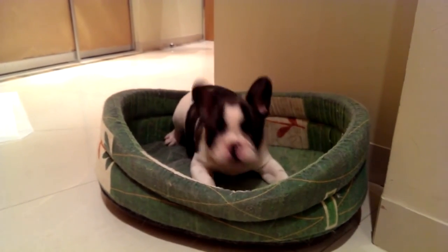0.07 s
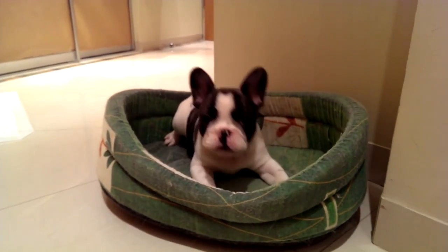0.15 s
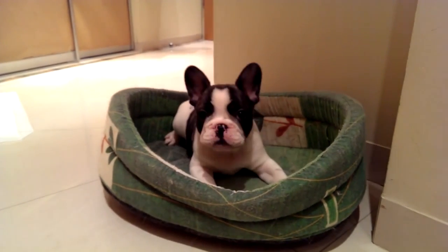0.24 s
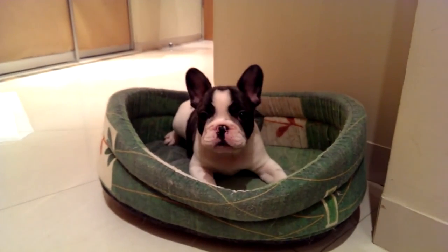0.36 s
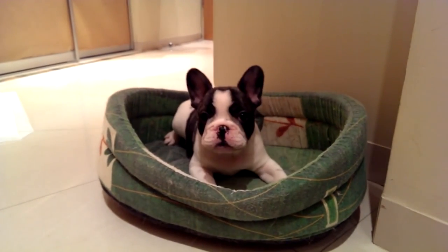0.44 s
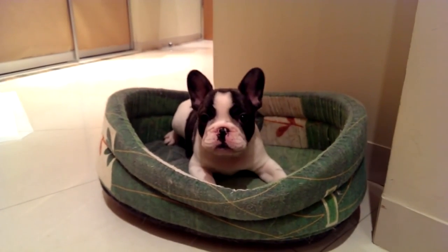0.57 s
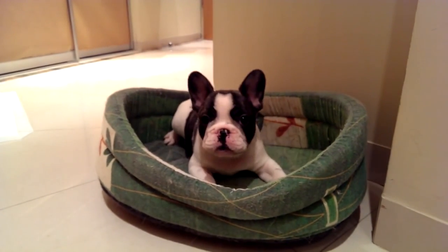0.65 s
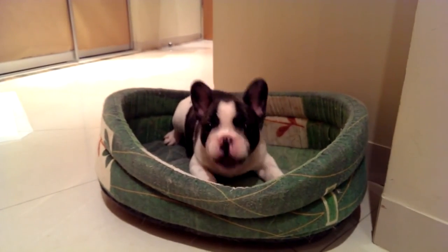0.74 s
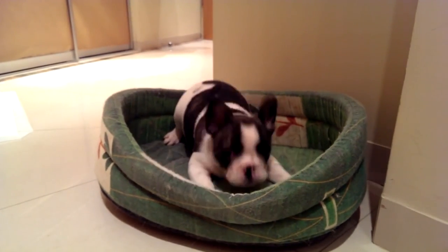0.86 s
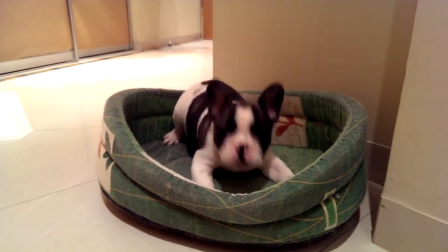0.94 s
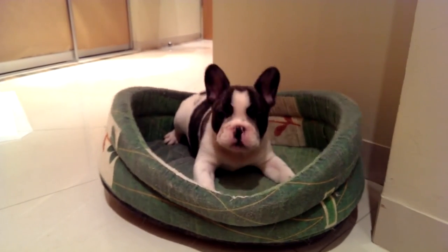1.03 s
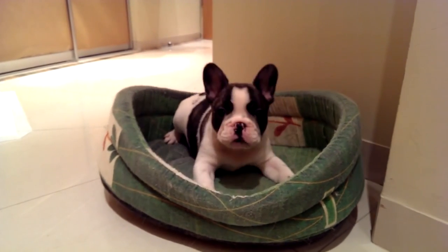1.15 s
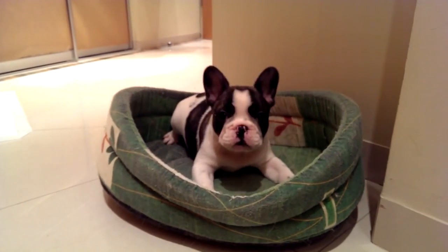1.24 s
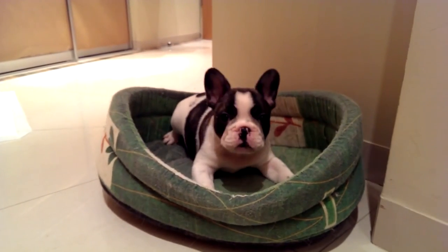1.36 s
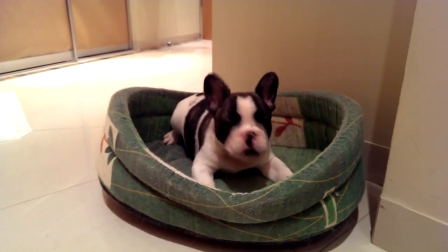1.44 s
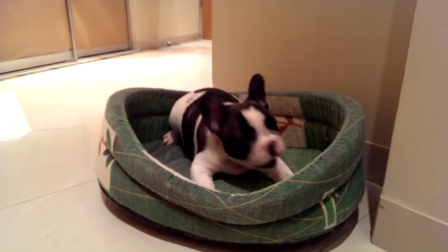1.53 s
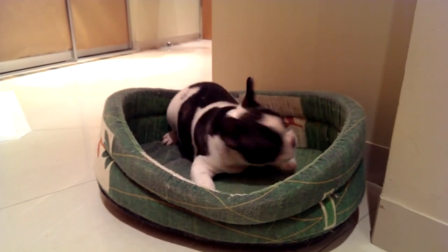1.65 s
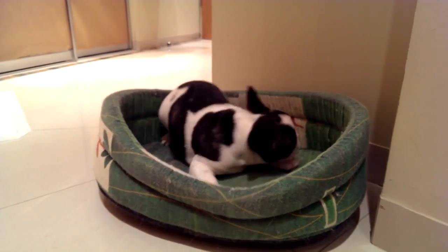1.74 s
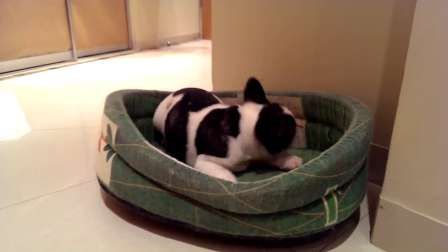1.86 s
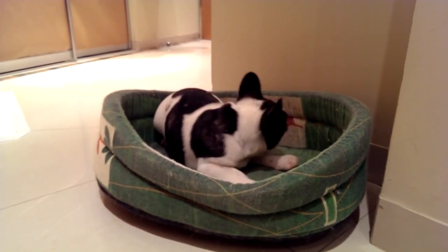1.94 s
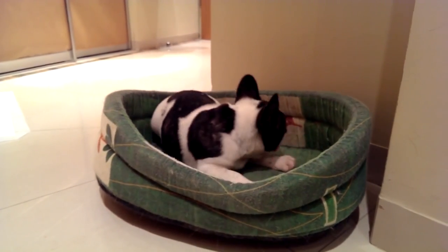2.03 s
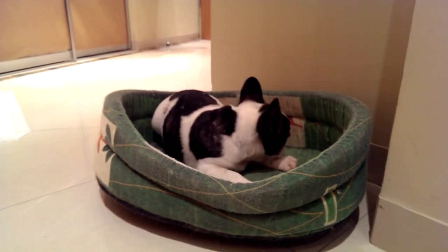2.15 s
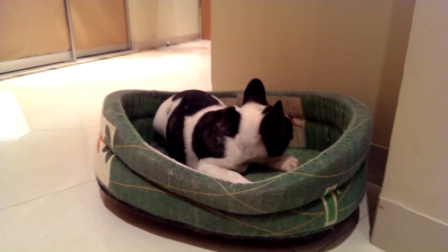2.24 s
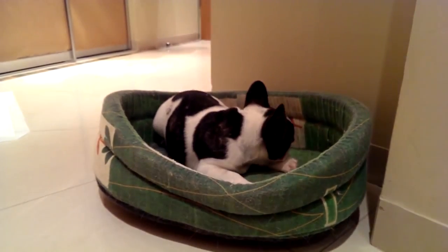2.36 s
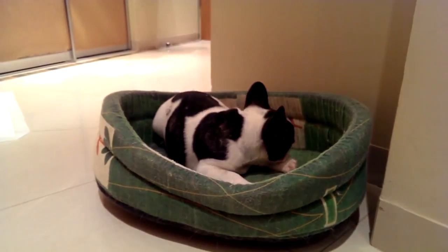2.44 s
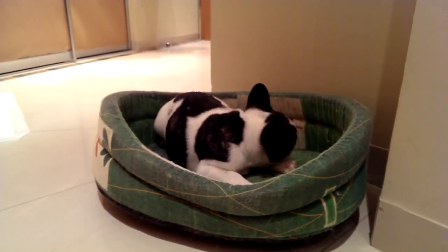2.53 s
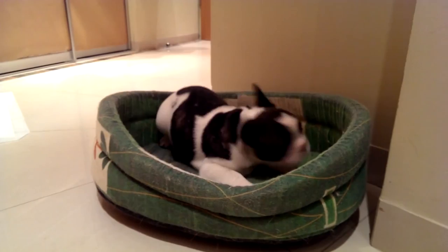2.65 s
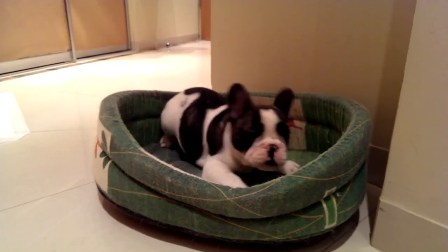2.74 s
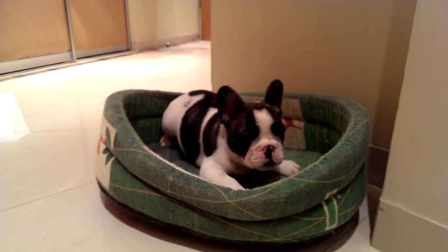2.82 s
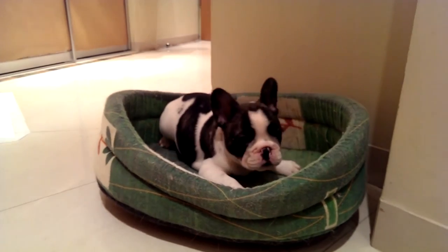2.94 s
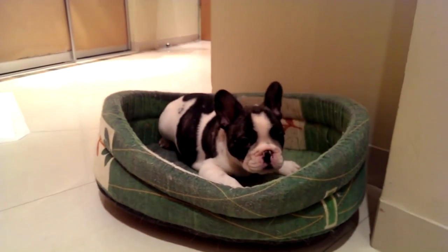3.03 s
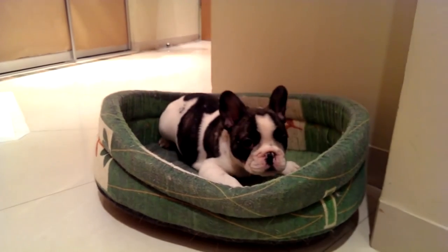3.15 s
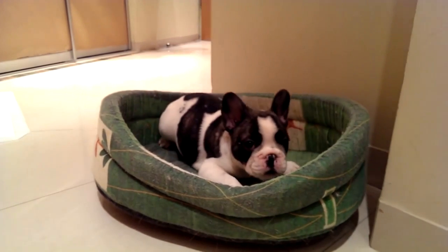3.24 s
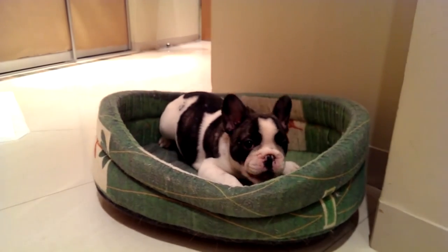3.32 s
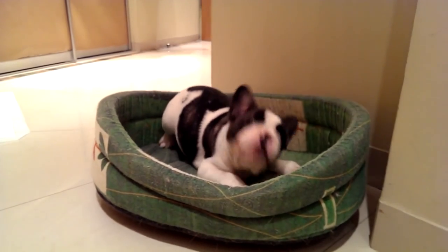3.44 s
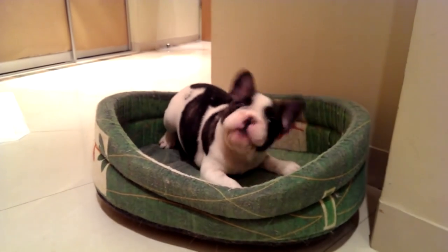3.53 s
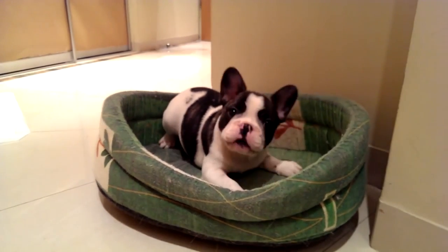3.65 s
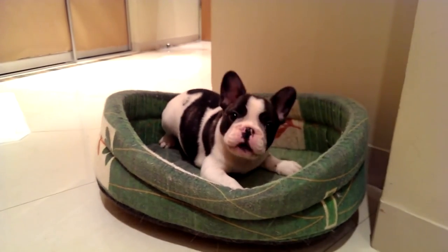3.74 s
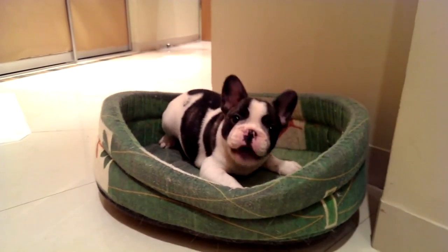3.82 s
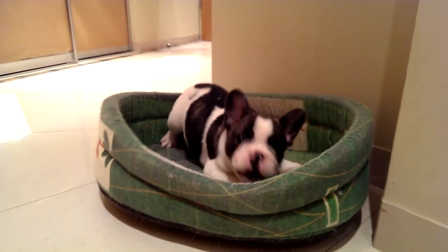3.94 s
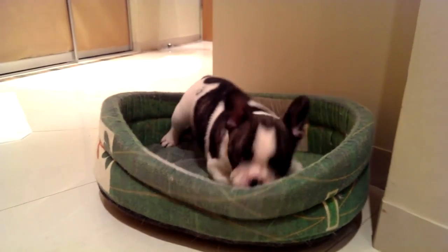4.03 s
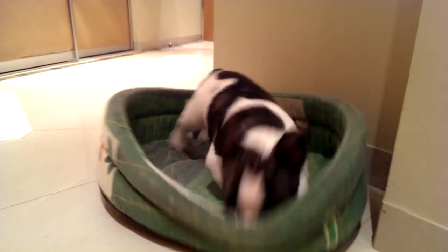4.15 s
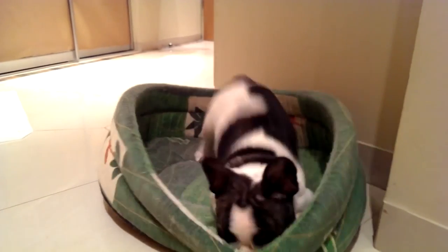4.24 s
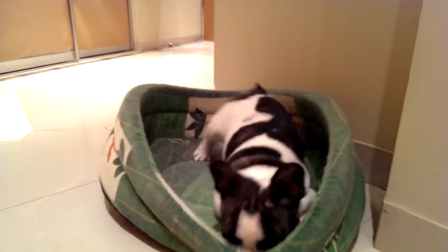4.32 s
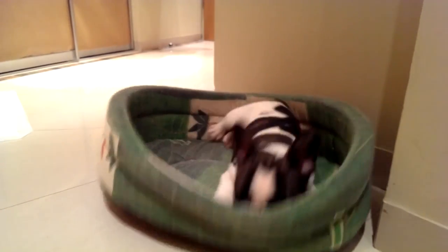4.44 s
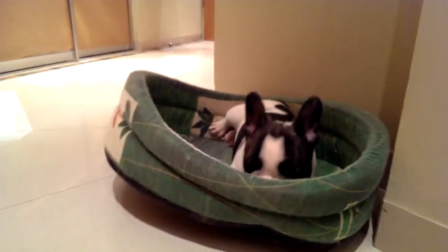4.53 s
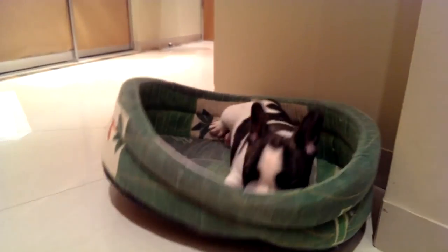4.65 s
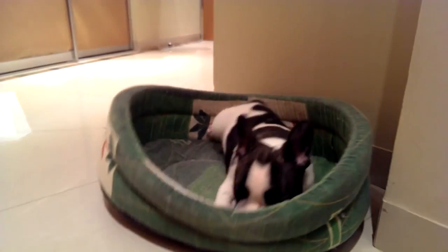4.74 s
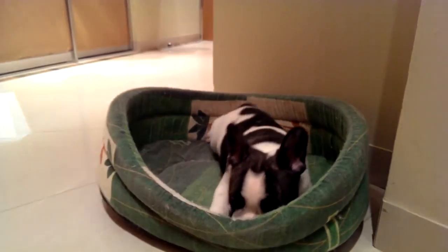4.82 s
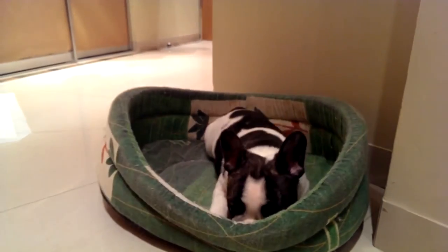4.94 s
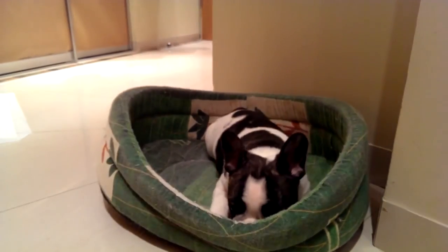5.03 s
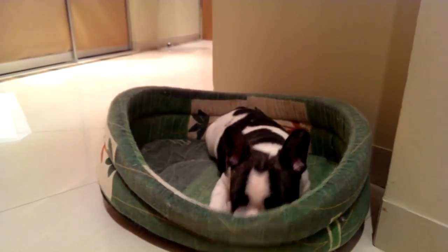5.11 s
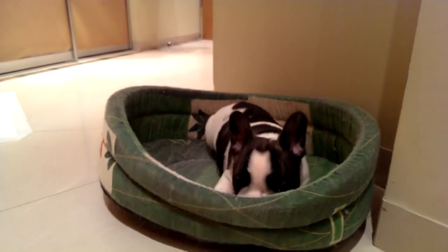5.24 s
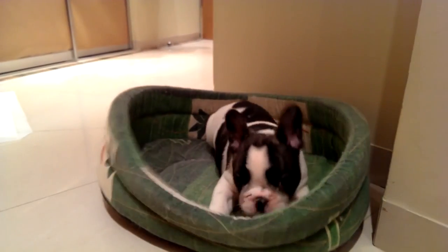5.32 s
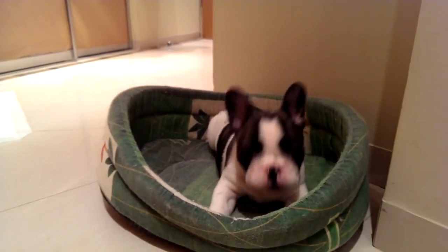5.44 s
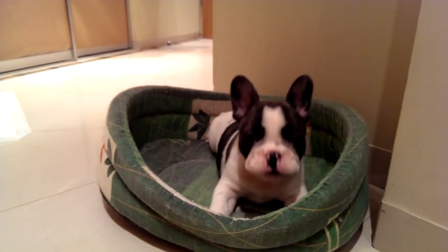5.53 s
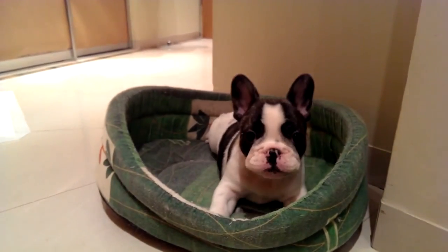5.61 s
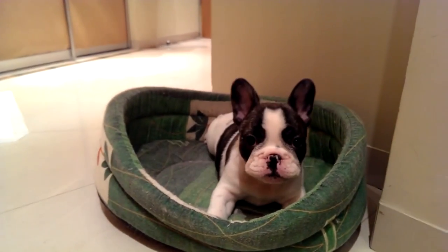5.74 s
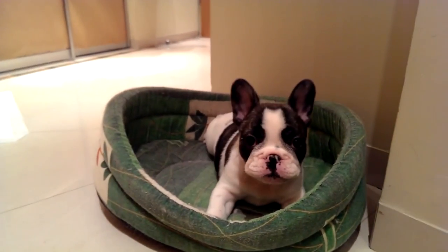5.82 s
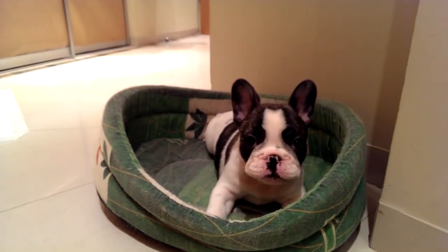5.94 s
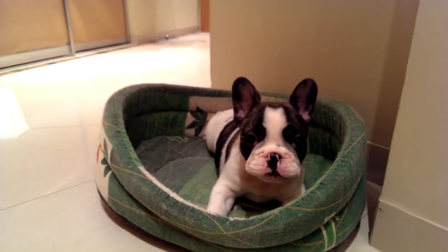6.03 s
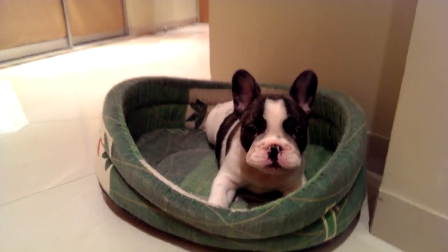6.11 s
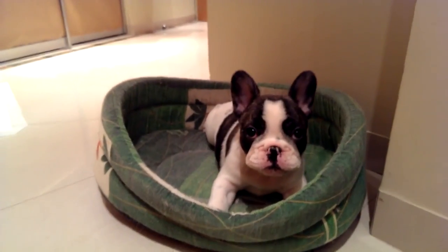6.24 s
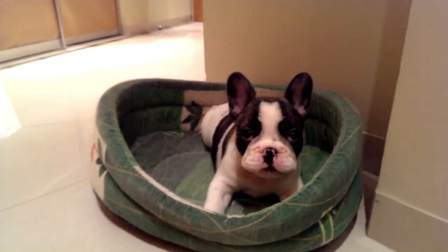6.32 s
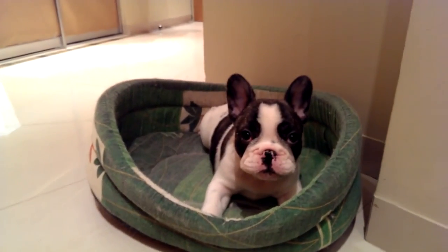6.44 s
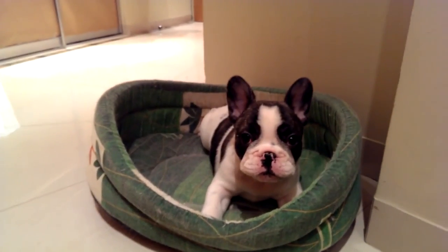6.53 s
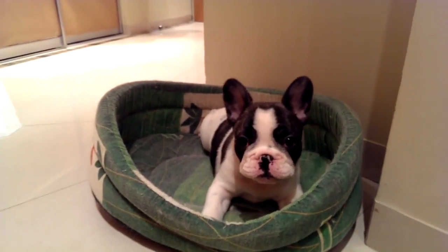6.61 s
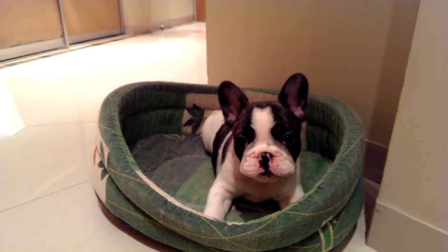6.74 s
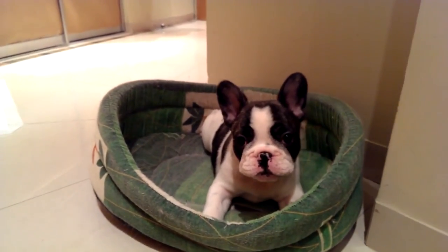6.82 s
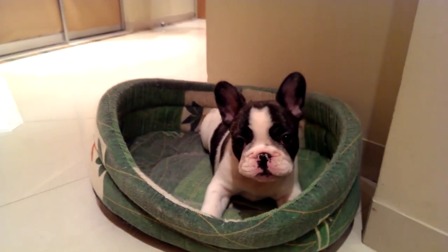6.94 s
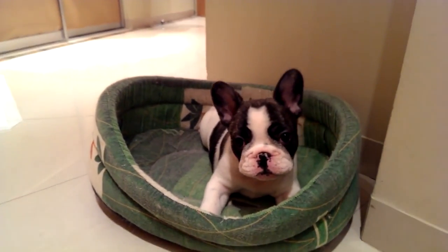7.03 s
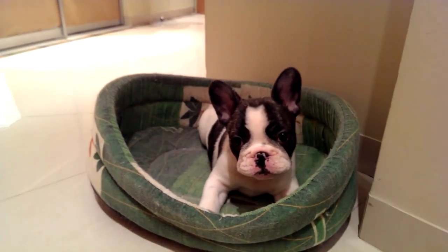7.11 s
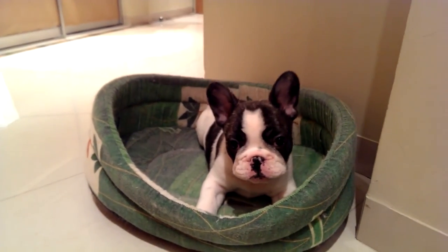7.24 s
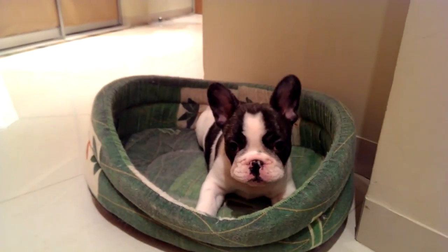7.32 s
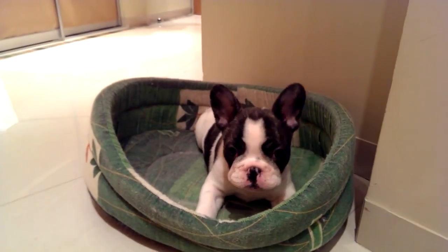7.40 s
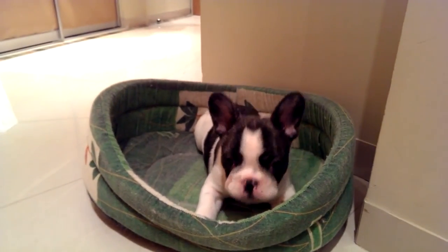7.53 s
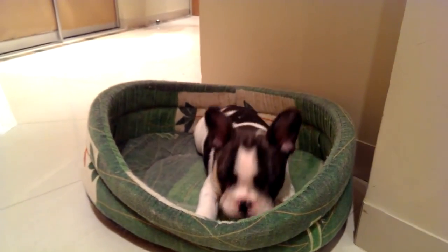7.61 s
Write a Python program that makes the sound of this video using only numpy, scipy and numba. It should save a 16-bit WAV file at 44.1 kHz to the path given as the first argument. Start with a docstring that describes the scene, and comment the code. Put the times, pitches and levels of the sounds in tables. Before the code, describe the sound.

A small puppy gives short, raspy snorting barks about a second apart in a bare quiet room, then paws knock and its padded bed creaks.

```python
"""A flat-nosed puppy lies in a padded bed on a tiled floor, a metre from a hand-held camera.
Microphone hiss (banded noise) and a low rumble (noise on two low resonances) run from the start.
Soon come short unvoiced snort-barks: uneven palate flaps and rushing air ring nose, mouth and throat,
and the bare room rings briefly. Treble ticks and brief nostril whistles (gliding sines) follow.
Then paws and claws knock (struck resonances), and later the bed drags and creaks (rubbing noise)."""
import sys
import numpy as np
from scipy import signal
from scipy.fft import rfft, irfft
from scipy.io import wavfile
from scipy.ndimage import uniform_filter1d
from numba import njit

SR = 44100
rng = np.random.default_rng(int(sys.argv[2]) if len(sys.argv) > 2 else 0)


def put_to_file(sound):
    """Save the sound as 16-bit audio at rate SR, in the file named by the first command-line argument."""
    columns = np.atleast_2d(sound).T  # one column per channel
    safe = np.clip(columns, -1, 1)
    whole_steps = np.round(safe * 32767)
    wavfile.write(sys.argv[1], SR, whole_steps.astype(np.int16))


N = 338287
PORT_LAG = 5  # samples by which the right microphone port hears later
OPPOSED = np.array([[1], [-1]])  # a side signal enters left and right with opposite signs


def undb(db):
    """Level to amplitude ratio: 20 dB is a factor of ten."""
    return 10 ** (np.asarray(db) / 20)


def level(x, db=0):
    """Normalization: scales a signal to a given root-mean-square level."""
    return x * undb(db) / np.sqrt(np.mean(x ** 2))


@njit
def svf(x, hz, width):
    """Simple resonance: a state-variable band-pass with a moving centre, gain 1 there."""
    y, low_state = np.empty(len(x)), 0.
    band_state = 0.
    for i in range(len(x)):
        g, k = np.tan(np.pi * hz[i] / SR), width / hz[i]
        v = (band_state + g * (x[i] + 1e-18 - low_state)) / (1 + g * (g + k))
        band_state, low_state = 2 * v - band_state, low_state + 2 * g * v
        y[i] = k * v
    return y


def band(x, hz, width):
    """Cascaded resonance: two equal band-passes in series give steeper skirts."""
    hz = np.clip(hz + np.zeros(len(x)), 20, .45 * SR)
    return svf(svf(x, hz, 1. * width), hz, 1. * width)


def noise():
    """White noise: equal mean power at all frequencies."""
    return rng.standard_normal(N)


def walk(rate):
    """Random modulation: levels held 1 / rate s and smoothed twice; spread near 1."""
    k = int(SR / rate)
    steps = np.repeat(rng.standard_normal(N // k + 1), k)
    return 0.66 * uniform_filter1d(uniform_filter1d(steps, k), k)[:N]


def tracks(rows, length, edge_s=0.0018, release_s=.012):
    """Gating: a gate open during each event, the time since its start, and its columns held meanwhile."""
    t, rows = np.arange(N) / SR, np.array(rows)
    held = rows[np.clip(np.searchsorted(rows[:, 0], t, "right") - 1, 0, None)].T
    since = t - held[0]
    closing = (held[length] - since) / np.minimum(release_s, held[length] / 3)
    gate = np.clip(np.minimum(since / edge_s, closing), 0, 1)
    return gate, np.clip(since, 0, held[length]), held


def swell_db(since, rise_s, rise_db, fall, bend=1):
    """Envelope: climbs rise_db to 0 dB within rise_s, then decays at a steady dB per second."""
    climb = -rise_db * np.clip(1 - since / rise_s, 0, 1) ** bend  # bend above 1: fastest at first
    return climb - fall * np.clip(since - rise_s, 0, None)


def struck(s, db, hz, width):
    """Impulse response: blows ring a resonance retuned at each; sudden start, exponential decay, peak near db."""
    at = (np.asarray(s) * SR).astype(int)
    blows = np.zeros(N)
    blows[at] = undb(db) * SR / (2 * np.pi * width)
    tuned = np.clip(hz + 0. * at, 20, .45 * SR)
    held = tuned[np.clip(np.searchsorted(at, np.arange(N), "right") - 1, 0, None)]
    return svf(svf(blows, held, 1. * width), held, 6.1 * width)


# spectrum of the room tone, only its shape counts: f/Hz, relative density/dB per Hz
AIR_SPECTRUM = [(41, -30), (70, 1.5), (86, -6), (121, -1.5), (158, -15.5), (238, -5.5), (342, -31),
                (503, -21), (577, -9.5), (631, -21), (1330, -19), (2150, -22.5), (15800, -29.5)]
# slow drift of the room tone: t/s, level from 1 to 8 kHz/dB
AIR_LEVELS = [(0, -72.5), (1.4, -73), (2.5, -74.5), (3.2, -71.5), (6.3, -70.5), (7.67, -72)]


def air():
    """Diffuse noise: half-octave bands of room tone and hiss, more coherent in the bass than the treble."""
    out, swell, table = 0, walk(0.2), np.array(AIR_SPECTRUM)
    for hz in 75 * 2 ** np.arange(0, 8, .5):
        mid, side = (svf(noise(), np.full(N, hz), hz / 2.5) for _ in range(2))
        loose = np.clip(130.0 / hz, .2, 1)  # the bass wanders more than the hiss
        density_db = np.interp(np.log(hz), np.log(table[:, 0]), table[:, 1])
        db = density_db + loose * (2.0 * swell + 0.61 * walk(2.1))
        out = out + undb(db) * (mid + np.clip(hz / 1200., .3, 1) * side * OPPOSED)
    s, db = np.transpose(AIR_LEVELS)
    hiss_band = signal.butter(4, [1000, 8000], "band", fs=SR, output="sos")
    hiss = signal.sosfilt(hiss_band, out.mean(axis=0))
    return out / hiss.std() * undb(np.interp(np.arange(N) / SR, s, db))


# swelling and fading of the rumble: t/s, level of its lower resonance/dB
RUMBLE_LEVELS = [(0, -61), (.17, -73), (.45, -66), (.75, -79), (1.18, -65), (1.6, -79.5), (1.8, -62),
                 (2.24, -77), (2.6, -76), (2.8, -63), (3.48, -59.5), (3.72, -71), (4.23, -64), (4.46, -70),
                 (4.6, -57), (5.19, -76), (6.09, -55.5), (6.56, -66), (7.67, -73.5)]


def rumble():
    """Modal filtering: noise gathers on a low room mode, swells and fades."""
    s, db = np.transpose(RUMBLE_LEVELS)
    mid, side = (level(band(noise(), 42., 14)) + level(band(noise(), 68.0, 30), -7.5) for _ in range(2))
    return undb(np.interp(np.arange(N) / SR, s, db)) * (mid + .18 * side * OPPOSED)


# puffs of breath: t/s, rise/s, length/s, nose level at the top of the swell/dB, fall/dB per s,
# nose f/Hz (at the end of the rise), rush f/Hz, jet rise/s, then against the nose: mouth level/dB,
# chest level/dB, throat level/dB, onset thump of chest and throat/dB, rush level/dB, nostril hiss level/dB
PUFFS = [(0.018, 0.043, .117, -33, 299.5, 1870, 5700, .04, -7, 0, -5, 12, -3, -3.5),
         (0.858, 0.023, .09, -18.5, 280.5, 1590, 5700, .03, -16.5, -12, -11.5, 10, -10, -17),
         (1.576, .006, .094, -57, 80, 1940, 5000, 0.0037, -6.5, -4.5, -11, 8, -1, -15),
         (1.686, .004, .134, -36.5, 113, 1700, 7000, .065, -9, -3.5, -6, 5, -7, -8.5),
         (2.63, 0.0043, .06, -61.5, 150, 1860, 5800, .03, 0, 7, 1, 3, -7, -16),
         (2.712, 0.044, .118, -39, 132, 1800, 6300, .07, -5.5, -2.5, -7, 17, -5, -6),
         (3.484, .006, .022, -37, 700.5, 1690, 6450, .006, -11.5, -10, -7, 4.5, -3, -11),
         (3.508, .018, .036, -42, 300, 1840, 6480, .02, -12, -14, 0, 3, -2.5, -2),
         (3.55, 0.011, .1, -42, 239, 1690, 6520, .01, -9, -1.5, -0.5, -3, -0.5, -7),
         (4.031, .006, .026, -9, 400.5, 2060, 5900, .02, -5.5, -22.5, -21.5, 3, -17.5, -34),
         (4.058, .002, .13, -22.5, 200.5, 1920, 5800, .003, -4.5, -13, -14, 3, -11.5, -21),
         (5.46, .034, .12, -64.5, 157, 1885, 6700, .07, 0, 3, 2.5, 3, 4, 11),
         (7.6, .04, .07, -74.5, 100, 1750, 6300, .045, -10, 2, -8, 3, 1, 11)]
MOUTH_HZ, FLAP_HZ = 1390, 191.25  # FLAP_HZ is the nominal rate of the uneven flaps
RISE_DB, RISE_BEND = 11, 1.6  # swell of the cavities
JET_RISE_DB, JET_RISE_BEND = 19, 1.4  # the jet of air has its own swell
NOSE_SAG_HZ_PER_S = 400
POP_S = .009  # decay of the thump as the palate first lets go
RELEASE_S = 0.017


def flow():
    """Relaxation: palate flaps at uneven intervals, each starting an exponentially decaying puff of air."""
    interval, strength = rng.standard_normal((int(N / SR * FLAP_HZ), 2)).T
    at = np.cumsum(SR / FLAP_HZ * np.exp(.35 * interval)).astype(int)
    flaps = np.zeros(N)
    flaps[at[at < N]] = undb(2.5 * strength[at < N])
    decay = np.exp(-1 / (0.0038 * SR))
    return flaps, 0.23 + level(signal.lfilter([1], [1, -decay], flaps))


def snorts():
    """Source and filter: flaps and turbulent air excite nose, mouth, chest and throat; a jet hisses on top."""
    gate, since, columns = tracks(PUFFS, 2, release_s=RELEASE_S)
    _, rise_s, _, peak_db, fall, nose_hz, rush_hz, jet_s = columns[:8]
    mouth_db, chest_db, throat_db, pop_db, rush_db, hiss_db = columns[8:]
    nose_db = peak_db + swell_db(since, rise_s, RISE_DB, fall, RISE_BEND)
    low_db = nose_db + pop_db * np.exp(-since / POP_S)
    jet_db = peak_db + swell_db(since, jet_s, JET_RISE_DB, fall, JET_RISE_BEND)

    flaps, puff = flow()
    drive = level(flaps) + level(puff * noise(), -7)
    jet = [puff * noise() for _ in range(4)]

    nose = band(drive, nose_hz - NOSE_SAG_HZ_PER_S * (since - rise_s), 350)
    mouth = band(drive, MOUTH_HZ, 280) + undb(-6) * band(drive, 1.93 * MOUTH_HZ, 240)
    chest = band(drive, 265., 170) + undb(-9) * band(drive, 160., 100)
    throat = band(drive, 570., 340) + undb(-8.5) * band(drive, 790., 330)
    rush = band(jet[0], rush_hz, 3200)
    rush = rush + undb(-1.0) * band(jet[1], 3700., 2800)
    rush = rush + undb(-2.5) * band(jet[2], 9000., 2700)
    hiss = band(jet[3], 13400., 7100)
    layers = [(nose_db, nose), (nose_db + mouth_db, mouth),
              (low_db + chest_db, chest), (low_db + throat_db, throat),
              (jet_db + rush_db, rush), (jet_db + hiss_db, hiss)]
    return gate * sum(undb(db) * level(x) for db, x in layers)


# single loud slaps of palate and lips:
# t/s, nose peak level/dB, nose f/Hz, throat peak level/dB, treble peak level/dB
SLAP_BLOWS = [(0.0209, -37.5, 1850, -38, -46), (0.0278, -29.5, 1840, -32.5, -42),
              (0.0558, -17.5, 1770, -25.5, -29), (0.063, -18.5, 2030, -36, -30),
              (0.8645, -25, 1730, -45.5, -46), (0.8709, -15, 1520, -36.5, -32),
              (0.8827, -5, 1800, -36.5, -16), (0.8882, -15.5, 1550, -40, -39.5),
              (1.629, -42, 1710, -62, -60), (1.6894, -20.5, 1680, -21, -43),
              (1.7107, -26, 1630, -48, -39.5), (2.7163, -37, 1720, -27, -54),
              (2.72, -28.5, 1590, -21.5, -49), (2.7301, -21, 1730, -52, -39),
              (2.7434, -23.5, 1770, -40, -33), (2.7564, -23, 1950, -26, -32),
              (3.4621, -39, 1720, -43.5, -30), (3.488, -31, 1890, -38, -38.5),
              (3.5579, -34, 1630, -44, -34), (3.5618, -32.5, 1668, -42, -37), (3.5807, -40, 1657, -52, -40),
              (3.598, -37, 1520, -46, -37), (3.6114, -41, 1880, -44, -46),
              (4.0089, -15.5, 2000, -34.5, -39), (4.0264, -14, 1930, -35, -34),
              (4.0357, -2, 2010, -34, -26), (4.0424, -3.5, 2190, -29.5, -28),
              (4.0456, -4, 1370, -39.5, -28), (4.0514, -1, 1390, -32, -24)]


def slaps():
    """Impulse excitation: lone slaps ring nose and throat, with two treble resonances."""
    s, db, hz, throat_db, treble_db = np.transpose(SLAP_BLOWS)
    treble = struck(s, treble_db, 6600., 2400) + undb(-2.5) * struck(s, treble_db, 13000., 2500)
    return struck(s, db, hz, 220) + struck(s, throat_db, 610.0, 370) + treble


# reverberant tail by band: f/Hz, decay time over 60 dB/s, relative level/dB
TAIL_BANDS = [(150.1, 0.98, -8), (290, 0.39, -2.5), (700., 0.42, 2), (1310, 0.62, -7.5), (2200., .48, -7.5),
              (3180, 0.32, -6.5), (4998, 0.36, -5.5), (9000., 0.33, -3), (13500., .2, -4)]
# first echoes, from floor, bed and wall: delay t/s, level/dB, left minus right level/dB
FIRST_ECHOES = [(.0023, -18, 6.5), (.0052, -16, -7.5), (.0088, -18, 6)]
LEAD = 256  # samples of room for the start of the response


def room(dry):
    """Convolution: direct sound, first echoes and a tail decaying band by band, most coherent in the bass."""
    t = np.arange(SR) / SR
    response = np.zeros((2, SR))
    response[:, LEAD] = 1
    for s, db, pan_db in FIRST_ECHOES:
        response[:, LEAD + int(s * SR)] += undb(db + np.array([pan_db, -pan_db]) / 2)
    # the right port lags in the bass; higher up the housing holds it a quarter turn behind
    turn = np.minimum(2 * np.pi * np.arange(SR // 2 + 1) * PORT_LAG / SR, np.pi / 2)
    response[1] = irfft(rfft(response[1]) * np.exp(-1j * turn), SR) * (t < .05)
    for hz, t60, db in TAIL_BANDS:
        mid, side = (level(svf(rng.standard_normal(SR), hz + 0 * t, 0.66 * hz)) for _ in range(2))
        onset = np.clip((t - LEAD / SR) / 0.0012, 0, 1)
        fade = undb(-60 * t / t60) * onset * np.sqrt(hz / t60) / (SR / 3.)
        response = response + undb(db) * fade * (mid + min(hz / 1200.0, 1.2) * side * OPPOSED)
    return signal.fftconvolve(dry, response, axes=1)[:, LEAD:LEAD + N]


# thin treble ticks: t/s, peak level/dB, centre f/Hz, left minus right level/dB
TICK_BLOWS = [(0.816, -37.5, 12760, 9.5), (1.5425, -36, 5670, 3), (1.7, -26, 7430, -2),
              (3.3807, -40.5, 4813, 1), (3.9806, -40.5, 6260, 11), (3.9883, -33, 11410, 2),
              (3.9947, -23.5, 9660, 3), (4.354, -35, 8300, 1.5), (5.2024, -37.5, 6600, 0),
              (5.4645, -40, 13600, 3), (5.49, -37, 11900, 1.5), (6.2587, -30.5, 9340, 18)]


def ticks():
    """Level panning: short, heavily damped resonances, each with its own left-right level difference."""
    s, db, hz, pan_db = np.transpose(TICK_BLOWS)
    return np.array([struck(s, db + side * pan_db / 2, hz, 2500) for side in (1, -1)])


# the nostril whistles for a moment:
# t/s, length/s, first f/Hz, last f/Hz, level before fading and mixing/dB
WHISTLE_GLIDES = [(.868, 0.072, 1543, 1530, -18), (1.688, .054, 1704, 1680, -41),
                  (2.728, 0.044, 1726, 1880, -33.5), (3.506, .034, 1853, 1830, -33.5),
                  (4.04, .018, 1380, 1395, -17.5)]
WHISTLE_FALL_DB_PER_S = 200


def whistles():
    """Frequency modulation: a fading near sine glides, its pitch and size shivering with the air stream."""
    gate, since, (_, length, first_hz, last_hz, db) = tracks(WHISTLE_GLIDES, 1, edge_s=0.02)
    hz = first_hz + (last_hz - first_hz) * since / length
    phase = 2 * np.pi * np.cumsum(hz * (1 + .01 * walk(150))) / SR
    fading_db = db - WHISTLE_FALL_DB_PER_S * since + 3.7 * walk(200)
    return gate * undb(fading_db) * np.sqrt(2) * np.sin(phase)


# paws and claws on bed and tiles:
# t/s, claw peak level/dB, claw f/Hz, thud f/Hz, then against the claw: thud level/dB, edge level/dB
KNOCK_BLOWS = [(1.5794, -39, 3230, 224, -3, -11), (2.6338, -39.5, 1950, 230, -3.5, -16),
               (3.8824, -24.5, 2730, 119.7, -30, -18), (3.8866, -22.5, 1620, 186.9, -21, -25),
               (4.5503, -48.5, 2890, 223, 9.5, -15.5), (4.6665, -21.5, 1870, 266, -13, 2),
               (4.6822, -26.5, 1950, 223, -34, -21), (4.705, -34, 1430, 265, -10.5, -26),
               (4.7698, -22.5, 1710, 196, -13, -18), (5.2038, -34.5, 1895, 135, -29, 7),
               (5.2957, -14, 1740, 259, -7.5, -11), (5.3242, -22, 1870, 233, -4, -26),
               (5.3797, -15.5, 1847, 175, -2.5, 0.5), (5.3974, -54, 1910, 161, -6, -15),
               (6.2511, -40, 1240, 306.4, -11, 6)]


def knocks():
    """Modal impact: a claw clicks with a bright, fast-decaying edge and the padded bed thuds."""
    s, db, hz, thud_hz, thud_db, edge_db = np.transpose(KNOCK_BLOWS)
    claw = struck(s, db, hz, 770)
    thud = struck(s, db + thud_db, thud_hz, 63)
    edge = struck(s, db + edge_db, 4300.0, 6300)
    return claw + thud + edge


# the bed drags and creaks under the body:
# t/s, rise/s, length/s, low level at the top of the swell/dB, cloth level there/dB
BED_RUBS = [(4.2, .1, 0.27, -59, -57.5), (4.5, .14, 0.15, -62, -65.5), (4.67, .02, 0.29, -62, -62),
            (5.28, 0.12, 0.154, -46.5, -66), (5.436, .036, 0.29, -51, -65.5)]
BED_RISE_DB, BED_FALL_DB_PER_S = 10, 101


def bed():
    """Friction noise: foam and cloth rub unevenly, as filtered noise of randomly wandering level."""
    gate, since, (_, rise_s, _, low_db, cloth_db) = tracks(BED_RUBS, 2, edge_s=0.015)
    low = undb(low_db + 5.6 * walk(40)) * level(band(noise(), 133.0, 142))
    cloth = undb(cloth_db + 7.0 * walk(65)) * level(band(noise(), 1440.0, 3700))
    return gate * undb(swell_db(since, rise_s, BED_RISE_DB, BED_FALL_DB_PER_S)) * (low + cloth)


def scene():
    """Superposition: puppy and ticks sound in the room; beamed whistle, air and rumble are added."""
    whistle = whistles()
    puppy = snorts() + slaps() + knocks() + bed() + 0.4 * whistle
    placed = puppy * undb(np.array([[.6], [-.6]]))  # slightly to the left
    # the whistle beams forward: most of it reaches the ports without filling the room
    beamed = .65 * np.array([whistle, np.roll(whistle, PORT_LAG)])
    return room(placed + ticks()) + beamed + air() + rumble()


def record(dry):
    """Band limiting and clipping: the camera drops the deepest bass, clips at full scale and cuts the top."""
    high_pass = signal.butter(4, 34, "high", fs=SR, output="sos")
    low_pass = signal.ellip(12, .2, 90, 15900, fs=SR, output="sos")
    clipped = np.clip(signal.sosfilt(high_pass, dry), -1, 1)
    return signal.sosfilt(low_pass, clipped)


dry = scene()
out = record(dry)
put_to_file(out)
```